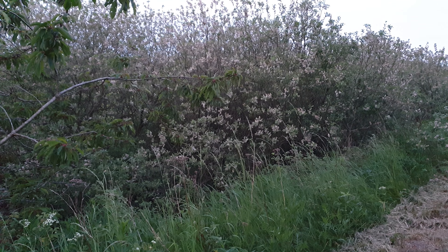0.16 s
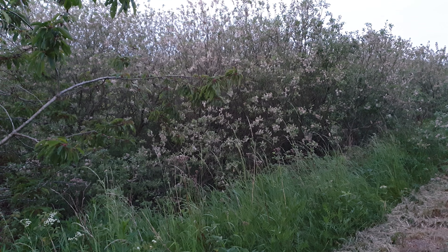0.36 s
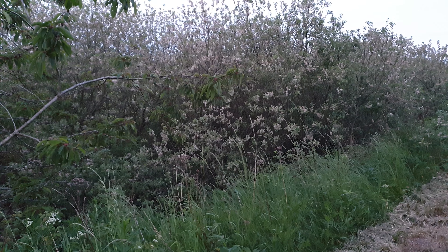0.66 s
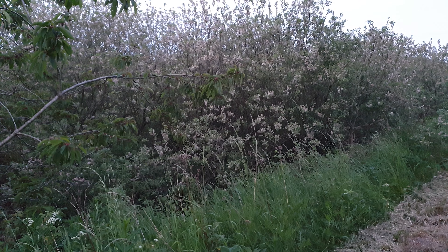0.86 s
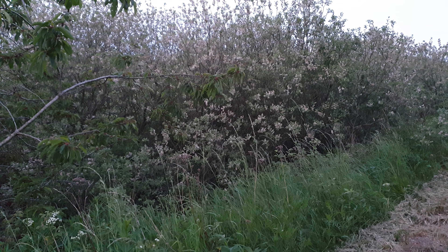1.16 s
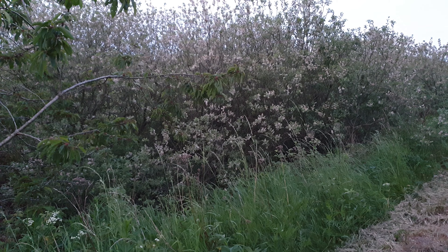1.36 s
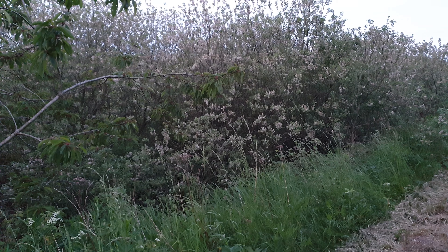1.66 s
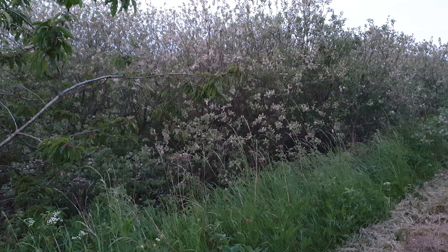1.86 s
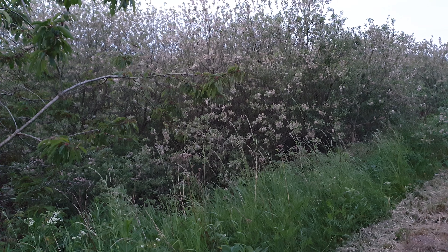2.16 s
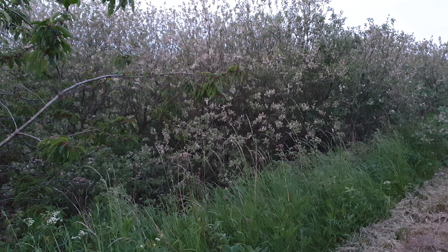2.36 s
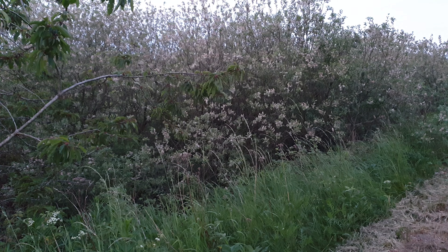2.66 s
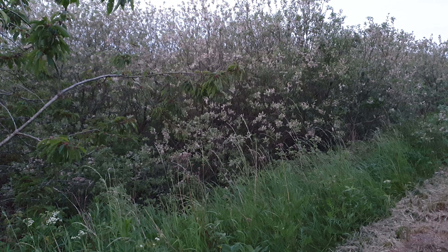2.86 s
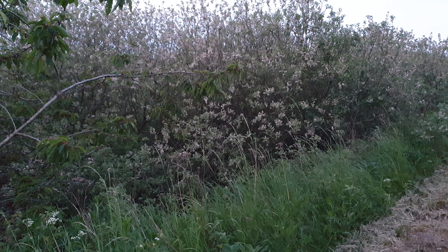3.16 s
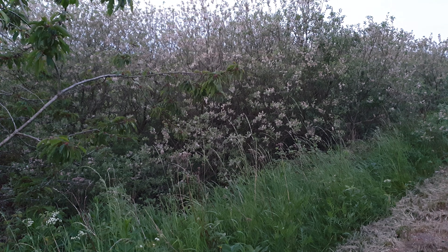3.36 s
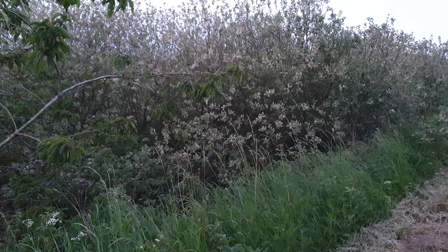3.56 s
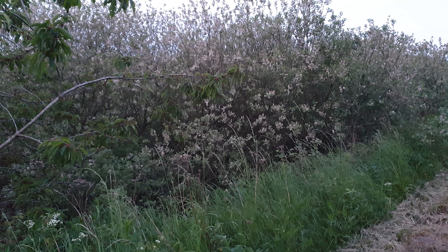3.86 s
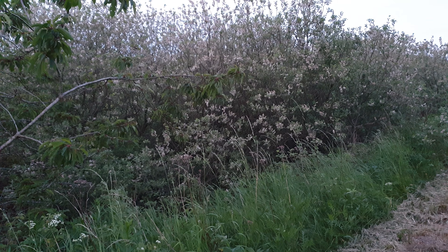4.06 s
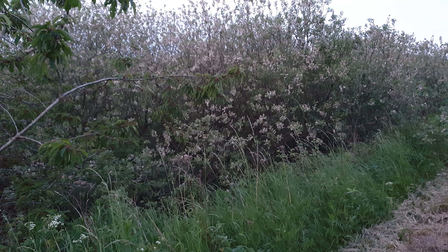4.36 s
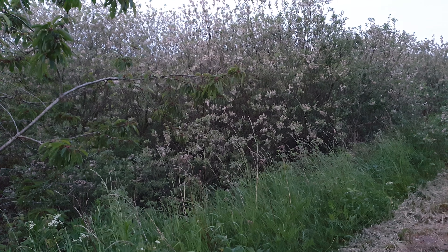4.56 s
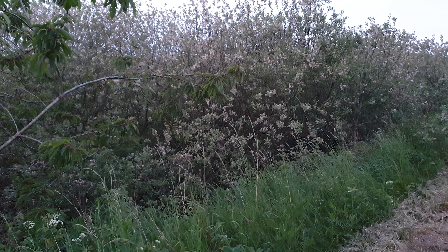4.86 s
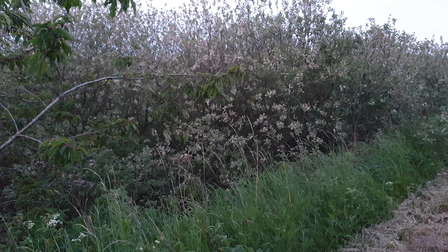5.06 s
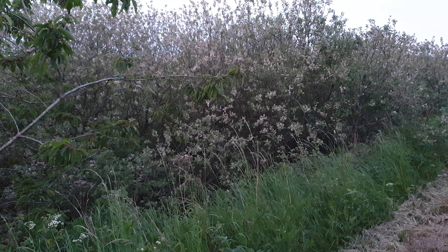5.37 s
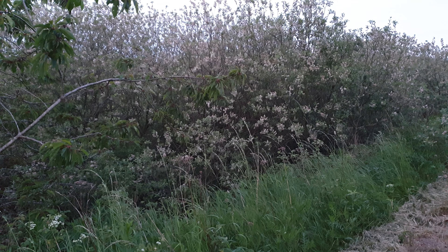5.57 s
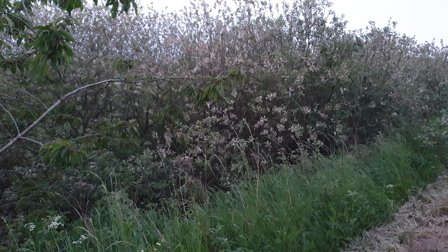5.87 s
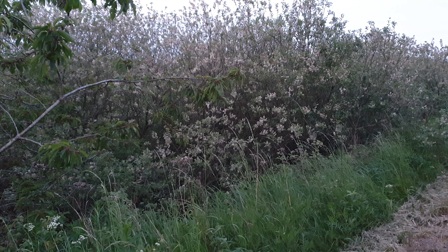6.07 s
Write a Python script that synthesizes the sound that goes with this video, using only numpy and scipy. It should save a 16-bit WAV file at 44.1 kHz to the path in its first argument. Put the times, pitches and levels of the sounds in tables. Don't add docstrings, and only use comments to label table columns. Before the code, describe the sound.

A hidden songbird whistles up, then high and down, trills, snaps, drops paired notes and rattles, while wind gusts rumble on the microphone.

```python
import sys
import numpy as np
from scipy import signal
from scipy.fft import rfft, irfft
from scipy.io import wavfile
from scipy.ndimage import uniform_filter1d

SR = 44100
rng = np.random.default_rng(int(sys.argv[2]) if len(sys.argv) > 2 else 0)


def nominal_scale(level):
    x = np.asarray(level, float) / 20
    return 10 ** x


def wav_out(sig):
    wavfile.write(sys.argv[1], SR, np.round(np.clip(np.atleast_2d(sig).T, -1, 1) * 32767).astype(np.int16))


N = 273861
LEAD = SR // 16

# time in seconds, pitch in Hz, level in dB.
RISING_NOTES = [
    [(-.04, 3138, -47.5), (-.02, 3474, -57.5), (0, 3885, -45.5), (.03, 4170, -50.5), (.05, 4624, -43.5),
     (.065, 4705, -48.5), (.08, 4580, -63), (.098, 4610, -72), (.108, 4550, -55)],
    [(.27, 2655, -70), (.29, 2672, -66.5), (.32, 2687, -53.5), (.365, 2684, -51.5), (.385, 2650, -68),
     (.42, 2633, -54), (.445, 2685, -50), (.468, 2820, -57)],
    [(.458, 2680, -49), (.475, 3050, -62), (.5, 3770, -52), (.53, 4190, -54), (.552, 4400, -49),
     (.56, 4570, -43.5), (.578, 4750, -70), (.6, 4630, -62)],
]
# time in seconds, pitch in Hz, level in dB.
FALLING_NOTES = [
    [(.952, 5960, -68), (.958, 7360, -56), (.972, 7900, -75)],
    [(1.005, 7850, -71), (1.02, 7730, -65), (1.035, 7320, -54.5), (1.05, 6930, -51), (1.065, 6620, -56),
     (1.08, 6484, -48), (1.106, 6410, -44), (1.12, 6315, -49.5), (1.126, 6240, -70)],
    [(1.488, 7130, -64), (1.495, 7600, -60), (1.512, 8800, -80)],
    [(1.525, 8400, -76), (1.54, 8000, -61.5), (1.56, 7060, -50), (1.59, 6900, -65), (1.603, 6436, -38),
     (1.615, 6410, -54), (1.624, 6300, -44.5), (1.63, 6000, -77)],
]
# left minus right in dB, second harmonic in dB, third harmonic in dB,
# and sometimes how much the second harmonic evens out (dB per dB).
RISING_TONE = [(-9.5, -38.5, -49.5), (3.5, -53, -66), (-14, -42, -56)]
FALLING_TONE = [(-2, -51, -60), (3.8, -55, -60), (-2, -56.5, -60), (5, -43, -60, .5)]
# start in seconds,
# length in seconds, first pitch in Hz, last pitch in Hz, level in dB.
FAR_NOTES = [
    (-.05, 0.22, 2705, 2650, -58.5),
    (.515, 0.12, 2196, 2090, -50.5),
    (.8, 0.044, 2380, 2370, -54),
    (.905, 0.08, 2980, 3240, -60),
    (.99, 0.43, 3200, 3340, -78),
    (2.47, 0.19, 2700, 2670, -66),
    (3.42, 0.13, 2300, 2460, -52.5),
    (3.54, 0.019, 2674, 2290, -51.5),
]
FAR_SETTLE = (.75, 1.9, 2.9)
# abrupt end in seconds, peak in dB, pitch factor, length factor.
TRILL_NOTES = [(1.836, -38, 1.0, 0.82), (1.866, -30.5, 1.0, 0.86), (1.899, -31.5, 0.98, 1.05),
               (1.93, -32, 0.98, 0.93), (1.953, -53, 0.98, 0.73), (2.204, -44, 0.94, 0.96),
               (2.233, -34, .99, 0.8), (2.264, -32.5, 1.006, 1.12), (2.292, -41.5, 1, 0.8),
               (2.549, -39.5, 0.97, 0.59), (2.58, -31.5, 1.025, 0.87), (2.61, -30.5, 1.017, 1.15),
               (2.642, -31.5, 1.001, 1.016), (2.673, -36, 0.99, 0.8), (2.697, -49, .999, 1.05),
               (2.927, -41, 0.95, 0.7), (2.957, -32, 0.99, 0.89), (2.988, -31.5, 1.01, 1.08),
               (3.02, -32, 1.007, 0.93)]
# onset in seconds, peak in dB, pitch factor, length factor, second harmonic in dB.
SNAP_NOTES = [
    (3.1445, -42, 0.88, 1.16, -18),
    (3.3236, -42, 0.96, 0.8, -13.5),
    (3.4975, -47, .92, 0.98, -20.5),
    (3.6738, -43.5, 0.95, 1.07, -20),
    (3.8385, -38.5, .99, 0.91, -17),
    (4.0161, -38.5, 1.007, .99, -16.5),
    (4.1868, -36, 1.033, 0.87, -21),
]
# onset in seconds, peak in dB.
DROP_NOTES = [(4.368, -39), (4.4157, -33.5), (4.549, -34), (4.604, -33.5), (4.7281, -33), (4.776, -30.5),
              (4.873, -31.5), (4.922, -29.5), (5.028, -32), (5.0758, -31), (5.176, -32.5), (5.2308, -31.5),
              (5.348, -33.5), (5.3989, -32.5), (5.5054, -33.5), (5.556, -32)]
# onset in seconds, peak in dB, pitch factor.
RATTLE_TICKS = [(5.6591, -48.5, 0.77), (5.6849, -45.5, 0.92), (5.7098, -45, 0.93), (5.7709, -45.5, 0.91),
                (5.7982, -45, 0.88), (5.821, -45, 0.98), (5.8775, -47, 0.89), (5.9031, -42.5, 1),
                (5.9275, -41, 0.87), (5.986, -44, 1), (6.009, -39.5, 0.94), (6.0345, -43.5, 1),
                (6.0873, -42.5, 1), (6.1117, -41.5, 1), (6.138, -41, 0.98), (6.1889, -40, 0.93)]
# seconds after onset, pitch in Hz, level in dB.
TRILL_SHAPE = [
    [(-.027, 1420, -30), (-.022, 1740, -18), (-.017, 1940, -7), (-.012, 2020, -1.5), (-.008, 2030, -.1),
     (-.004, 1995, -1.5), (-.001, 1850, -8), (.001, 1620, -20), (.0035, 1380, -32)],
    [(.004, 1980, -26), (.008, 2010, -13), (.011, 2010, -13), (.015, 1990, -26)],
]
DROP_SHAPE = [
    [(-.001, 2600, -35), (.001, 2483, -4.5), (.003, 2206, 3.5), (.006, 1820, -2), (.009, 1576, -9.5),
     (.013, 1380, -7.5), (.017, 1260, -13.5), (.021, 1224, -23), (.025, 1103, -33.5)],
]
SNAP_SHAPE = [
    [(-.001, 7580, -8), (.0008, 7185, -13.5), (.003, 5680, -8.5), (.006, 3560, -14.5)],
    [(.008, 7105, -9), (.01, 6626, -8), (.013, 5590, -6), (.017, 4120, -8), (.021, 2960, -20),
     (.028, 2200, -19)],
    [(.013, 10020, -30.5), (.0155, 8840, -8), (.02, 7090, -2), (.025, 5800, -14.5), (.03, 4820, -6)],
]
TICK_SHAPE = [
    [(-.0004, 9320, 3.5), (.0001, 6480, -8), (.0007, 5810, -1.5), (.0012, 3330, -2), (.0017, 2200, -15.5)],
    [(.0014, 8600, -21.5), (.0019, 6600, 3.5), (.0026, 5180, -22), (.0032, 2720, -8)],
]
# pitch in Hz, boost in dB.
BEAK_GAPES = [(5400, 1.5), (6300, 5), (5800, 8.5), (5900, 4.5), (6640, 2), (6480, 4.5), (6500, 0.5)]
# frequency in Hz, level in dB.
BEAK_COLOUR = [(2000, -10), (3500, 4.5), (4900, -3), (6300, -1), (7500, -6), (8700, -2.5), (9700, 0.5),
               (11000, -4.5), (12800, -18.5), (15200, -25)]
# delay in seconds, level in dB.
BANK_DELAY, BANK_DB = (0.018, -12.5)
# frequency in Hz, seconds to fall 60 dB.
HEDGE_DECAY = [(1000, 0.65), (2000, 0.3), (4500, 0.31), (7000, 0.34), (12000, 0.21)]
# frequency in Hz, level in dB.
HEDGE_LEVEL = [(1000, -18), (2200, -11), (4500, 1), (6500, -2), (9000, -0.5), (13000, 26)]
# frequency in Hz, dB over the tail.
NEAR_TWIGS = [(1000, 2), (2500, 2), (4000, 5.5), (7000, 14), (13000, 4.5)]
# frequency in Hz, rise in seconds.
ECHO_BUILD = [(2600, .009), (3600, .0006)]
# frequency in Hz, lag in samples.
RIGHT_LAG = [(1500, 0.37), (2700, 5.06), (4500, 4.78), (6400, 5.62), (8500, 3.94), (12000, 9.2)]
# peak in seconds, peak in dB, left minus right in dB, reach in seconds.
LOW_GUSTS = [(0.05, -50.5, -16, 0.13), (0.339, -45.5, -20, 0.18), (.475, -38, -38, 0.17),
             (.8, -54.5, -23, 0.58), (1.07, -47, -3, 0.03), (1.308, -45.5, -30, 0.052),
             (1.4, -40, -32, 0.02), (1.55, -69, -25, 0.16), (1.679, -46, -34, 0.25), (1.849, -69, -7, 0.94),
             (2.149, -49, -14, 0.55), (2.276, -43.5, 0, 0.27), (2.7, -43.5, -19, 0.17),
             (2.919, -48.5, -6.5, 0.98), (3.061, -40, -27.5, 0.049), (3.25, -43, -26, 0.69),
             (3.579, -36, -11, 0.08), (3.931, -40, -11, 0.15), (4.16, -42.5, -17, 0.22),
             (4.256, -38, -37, 0.065), (4.796, -53, 21, 0.057), (5.002, -46, 43, 0.074),
             (5.127, -46, -17, 0.045), (5.356, -74, -1, 0.078), (5.52, -46.5, -17, 0.15),
             (5.658, -28.5, -25, 0.017), (5.839, -49.5, -35, 1), (5.943, -32.5, -24, 0.11),
             (6.049, -26, -47, 0.034), (6.146, -25.5, -30, 0.029)]
# peak in seconds, peak in dB, reach in seconds.
BRIGHT_GUSTS = [(0, -49.5, 0.035), (0.451, -53.5, 0.32), (2.35, -55.5, 0.71), (3.1, -56, 0.95),
                (3.7, -58, 0.11), (3.919, -57, 0.1), (4.259, -58, 0.4), (5.732, -32.5, 0.022),
                (5.901, -60, 0.11), (6.049, -33, 0.012), (6.143, -38.5, 0.048)]
# frequency in Hz, level in dB per Hz.
WIND_COLOUR = [(8.8, -41), (15, -23), (43, 2.5), (64, 3), (128, -16), (166, -19.5), (200, -33),
               (260, -33.5), (440, -120)]
WHOOSH_COLOUR = [(71, -22.5), (120, -3), (162, -11.5), (216, -10.5), (318, -29.5), (450, -47), (580, -47.5),
                 (990, -120)]
AIR_COLOUR = [(71, -44), (120, -0.5), (140, -2), (195, -15), (260, -9.5), (374, -20), (636, -24),
              (958, -20.5), (1870, -26.5), (2340, -15), (2810, -27), (4500, -38.5), (5850, -59.5),
              (9900, -120)]
HISS_COLOUR = [(2650, -27), (4500, -3.5), (5910, -5), (6490, -8.5), (7790, -12), (9170, -10.5), (11800, 1),
               (12800, -1), (15100, .1), (15700, -3.5)]
ROAR_COLOUR = [(410, -40.5), (700, -16), (1010, -3.5), (1160, -7.5), (1360, -7.5), (1600, -38),
               (2080, -62.5), (3520, -120)]
DRONE_COLOUR = [(420, -14.5), (520, 2.5), (580, 9), (660, 2.5), (800, -47.5)]
# frequency in Hz, likeness from 0 to 1.
AIR_LIKENESS = [(200, 0.89), (700, 0.12), (1500, 0.27), (2500, 0.2), (4500, 0.14)]
# time in seconds, level in dB.
HUM_LEVEL = [(0, -60), (.55, -59), (.8, -69), (1.3, -68.5), (2.2, -77), (6.21, -84.5)]
ROAR_LEVEL = [(1.0, -86), (1.5, -76), (1.9, -61), (2.5, -59), (3.55, -59.5), (4.15, -62.5), (4.4, -68),
              (6.2, -101.5)]
DRONE_LEVEL = [(2.4, -92.5), (3.03, -84.5), (3.4, -71.5), (4.77, -75.5), (5.37, -82.5), (6.2, -83)]
# frequency in Hz, level in dB.
HUM_TONES = [(96, -6), (146, -5), (192, -2)]
# time in seconds, pitch factor.
ROAR_PITCH = [(.9, 1.17), (2.4, 1.06), (3.4, 0.99), (4.6, 0.91)]
GAP_FROM, GAP_TO = (.88, 1.72)


def evened(x):
    return x / np.sqrt(np.mean(x ** 2) + 1e-20)


def smooth_chance(shape, *sizes):
    x = rng.standard_normal(shape)
    for size in sizes:
        x = uniform_filter1d(x, size=size)
    return evened(x)


def read(points, hz):
    f, value = np.transpose(points)
    return np.interp(np.log(hz + 1), np.log(f + 1), value)


def follow(rows):
    s, value = np.transpose(rows)
    return np.interp(np.arange(N) / SR, s, value)


def add(mix, s, sound):
    part = mix[:, round(s * SR) + LEAD:][:, :sound.shape[1]]
    part += sound[:, :part.shape[1]]


def noise(spectrum, same, patchy_db, size=1024, slide=((0, 1), (9, 1))):
    frames, hz = 4 * N // size + 5, np.fft.rfftfreq(size, 1 / SR)
    a, b, c, d, patches = rng.standard_normal((frames, len(hz), 5)).T
    patches = uniform_filter1d(patches, size=9, axis=0)
    patches = evened(uniform_filter1d(patches, size=12, axis=1))
    same = np.clip(same + 0 * hz, -1, 1)[:, None]
    left = a + 1j * b
    right = same * left + np.sqrt(1 - same ** 2) * (c + 1j * d)
    factor = np.interp(np.arange(frames) * size / 4 / SR, *np.transpose(slide))
    level_db = read(spectrum, hz[:, None] / factor) + patchy_db * patches
    z = np.array([left, right]) * nominal_scale(level_db)
    return evened(signal.istft(z, nperseg=size, noverlap=3 * size // 4)[1][:, :N])


def sweep(s, hz, db, pan_db, second_db, third_db, even=0, gape=(1, 0)):
    t = np.arange(s[0], s[-1], 1 / SR)
    level_db = np.interp(t, s, db)
    pitch = uniform_filter1d(np.interp(t, s, hz), size=len(t) // 14 + 1, mode="nearest")
    turn = 2 * np.pi * np.cumsum(pitch) / SR + 2 * np.pi * rng.random()
    second = nominal_scale(second_db + even * (max(db) - level_db))
    beak_db = gape[1] * np.exp(-(np.log(pitch / gape[0]) / 0.15) ** 2)
    tone = np.sin(turn) * nominal_scale(beak_db) + second * np.sin(2 * turn)
    tone += nominal_scale(third_db) * np.sin(3 * turn) * (max(hz) < SR / 7)
    tone *= nominal_scale(level_db) * signal.windows.tukey(len(t), min(0.0054 * SR / len(t), .3))
    side = np.interp(t, s, pan_db * np.ones(len(s))) / 2
    return s[0], tone * nominal_scale(np.array([side, -side]))


def syllables(events, shape, gain_db, pan_db, third_db, second_db=0, even=0, gapes=None):
    out = np.zeros((2, N + LEAD))
    for (at, peak_db, factor, stretch, *own_db), gape in zip(events, gapes or [(1, 0)] * len(events)):
        for rows in shape:
            s, hz, db = np.transpose(rows)
            level_db = db + peak_db + gain_db
            octave_db = second_db + sum(own_db)
            add(out, *sweep(at + s * stretch, hz * factor, level_db, pan_db, octave_db, third_db, even, gape))
    return out


def far_birds():
    attack, release = 0.2, 0.84
    fade_db, waver_db = 22.5, 1.5
    sag, wobble = 0.028, 0.006
    until, bend, ease = FAR_SETTLE
    out, u = np.zeros((2, N + LEAD)), np.linspace(0, 1, num=60)
    ends = np.maximum(1 - u / attack, 0) ** 2 + np.maximum(1 - (1 - u) / release, 0) ** 2
    for at, length, from_hz, to_hz, level_db in FAR_NOTES:
        waver = uniform_filter1d(rng.standard_normal(len(u)), size=5) * np.sqrt(5)
        hz = to_hz + (from_hz - to_hz) * np.maximum(1 - (u / until) ** bend, 0) ** ease
        hz = hz * (1 - sag * u ** 4 + wobble * waver[::-1])
        db = level_db - fade_db * ends + waver_db * waver
        add(out, *sweep(at + u * length, hz, db, pan_db=.5, second_db=-74, third_db=-55))
    return out


def whistles(notes, tones):
    out = np.zeros((2, N + LEAD))
    for rows, tone in zip(notes, tones):
        add(out, *sweep(*np.transpose(rows), *tone))
    flutter = signal.oaconvolve(rng.standard_normal(N + LEAD), signal.windows.blackman(700), "same")
    out *= nominal_scale(1.6 * evened(flutter))
    return signal.sosfilt(signal.butter(10, 13400, "low", fs=SR, output="sos"), out)


def late(x):
    hz = np.fft.rfftfreq(len(x), 1 / SR)
    return irfft(rfft(x) * np.exp(-2j * np.pi * hz * read(RIGHT_LAG, hz) / SR), len(x))


def hedge(x):
    hz = np.fft.rfftfreq(256, 1 / SR)
    out, length = np.zeros((2, N + LEAD)), SR * 3 // 4
    for k in range(3):
        taps = np.zeros((2, length))
        at = np.arange(60, length - 16, 16) + rng.integers(0, 16, (2, (length - 61) // 16))
        np.put_along_axis(taps, at, rng.choice([-1., 1.], at.shape), 1)
        t, z = signal.stft(taps, SR, nperseg=256)[1:]
        fade = nominal_scale(-60 * t / read(HEDGE_DECAY, hz)[:, None])
        twigs_db = read(NEAR_TWIGS, hz)[:, None] - 60 * t / 0.037
        fade = np.sqrt(fade ** 2 + nominal_scale(twigs_db))
        fade *= (1 - np.exp(-(t + .001) / read(ECHO_BUILD, hz)[:, None])) ** 2
        fade *= nominal_scale(read(HEDGE_LEVEL, hz))[:, None] / np.sqrt((fade ** 2).sum(1, keepdims=True) * 4)
        tail = signal.istft(z * fade, SR, nperseg=256)[1]
        opening = np.clip((np.arange(tail.shape[1]) - 30) / 90, 0, 1)
        tail = tail * np.sin(np.pi / 2 * opening) ** 2
        tail[1] = .5 * late(tail[0]) + 1.24 * tail[1]
        turn = np.sqrt(2 / 3) * np.cos(2 * np.pi * (11 * np.arange(N + LEAD) / SR + k / 3))
        out += signal.fftconvolve(x.mean(0)[None] * turn, tail, axes=1)[:, :N + LEAD]
    return out


def puffs(at, peak_db, reach):
    return nominal_scale(2 * (peak_db - 20 * abs(np.arange(N) / SR - at) / reach))


def wind():
    calm_db, whoosh_calm_db = -70.5, -85
    power = nominal_scale(2 * calm_db) * np.full((2, N), .5)
    for at, peak_db, pan_db, reach in LOW_GUSTS:
        left_share = 1 / (1 + nominal_scale(-2 * pan_db))
        power = power + puffs(at, peak_db, reach) * np.array([[left_share], [1 - left_share]])
    ports = 2 * np.sqrt(power / power.sum(0))
    lumps = smooth_chance((2, N), 1500, 1500)
    low = np.sqrt(power.sum(0)) * noise(WIND_COLOUR, same=0.054, patchy_db=2.5, size=2048)
    bright = np.sqrt(nominal_scale(2 * whoosh_calm_db) + sum(puffs(*row) for row in BRIGHT_GUSTS))
    whoosh = nominal_scale(-3) * bright * noise(WHOOSH_COLOUR, same=.45, patchy_db=1.5)
    buffeting = ports * nominal_scale(1.6 * lumps - 1.2) * (low + whoosh)
    travel = .13
    return travel * np.tanh(buffeting / travel)


def open_air():
    likeness = read(AIR_LIKENESS, np.fft.rfftfreq(1024, 1 / SR))
    return nominal_scale(-65) * noise(AIR_COLOUR, same=likeness, patchy_db=2.5)


def engine_hum():
    speed = 1 + 0.01 * smooth_chance(N, 6000)
    turn = 2 * np.pi * np.cumsum(speed) / SR
    return nominal_scale(follow(HUM_LEVEL)) * sum(nominal_scale(db) * np.sin(hz * turn) for hz, db in HUM_TONES)


def microphone_hiss():
    return nominal_scale(-79.5) * noise(HISS_COLOUR, same=.1, patchy_db=.3)


def road_roar():
    roar = noise(ROAR_COLOUR, same=.85, patchy_db=1.3, slide=ROAR_PITCH)
    return nominal_scale(follow(ROAR_LEVEL) + 1.5) * roar


def trill():
    first = syllables(TRILL_NOTES[:5], TRILL_SHAPE, gain_db=-1.5, pan_db=-3.0,
                      third_db=-48.5, second_db=-34.5, even=1.17)
    rest = syllables(TRILL_NOTES[5:], TRILL_SHAPE, gain_db=-0.5, pan_db=-3.0,
                     third_db=-60.5, second_db=-45.0, even=0.94)
    return first + rest


def exhaust_drone():
    return nominal_scale(follow(DRONE_LEVEL)) * noise(DRONE_COLOUR, same=0.84, patchy_db=0.5)


def distance():
    far = open_air() + road_roar() + engine_hum() + exhaust_drone()
    far[0] = np.roll(far[0], 16)
    return far


def snaps():
    low_voice, high_voice = SNAP_SHAPE[:2], SNAP_SHAPE[2:]
    out = syllables(SNAP_NOTES, low_voice, gain_db=1.0, pan_db=-5.0, third_db=-28, even=0.24, gapes=BEAK_GAPES)
    out += syllables(SNAP_NOTES[:4], high_voice, gain_db=-5.0, pan_db=-4.5,
                     third_db=-60, second_db=-11, gapes=BEAK_GAPES[:4])
    out += syllables(SNAP_NOTES[4:], high_voice, gain_db=-1.5, pan_db=-4.0,
                     third_db=-60, second_db=-16.0, gapes=BEAK_GAPES[4:])
    return out


def drops():
    events = [(s, db, 0.97, 1.001) for s, db in DROP_NOTES]
    return syllables(events, DROP_SHAPE, gain_db=-1.0, pan_db=-3.0, third_db=-54.0, second_db=-45.0)


def rattle():
    chance = 1 + 0.05 * rng.standard_normal((len(RATTLE_TICKS), 2))
    ticks = [(s, db, factor, 0.93 * a * b) for (s, db, factor), (a, b) in zip(RATTLE_TICKS, chance)]
    return syllables(ticks, TICK_SHAPE, gain_db=4.0, pan_db=-3.0, third_db=-28, second_db=-19.5)


def rough_voice(x):
    x = x * (1 + .22 * smooth_chance(N + LEAD, 12))
    x = x * nominal_scale(2.5 * smooth_chance(N + LEAD, 70) - .5)
    hz = np.fft.rfftfreq(N + LEAD, 1 / SR)
    return irfft(rfft(x) * nominal_scale(read(BEAK_COLOUR, hz)), N + LEAD)


def bird():
    harsh = rough_voice(snaps() + rattle())
    trills, dropped = trill(), drops()
    song = harsh + whistles(RISING_NOTES, RISING_TONE) + whistles(FALLING_NOTES, FALLING_TONE)
    song += trills + dropped
    low = np.roll(nominal_scale(-6.5) * trills + nominal_scale(-4) * dropped, round(.002 * SR), axis=1)
    unscattered = trills + dropped - low + (1 - nominal_scale(-1)) * harsh
    song += nominal_scale(BANK_DB) * np.roll(song, round(BANK_DELAY * SR), axis=1)
    soften = signal.butter(6, 14600., "low", fs=SR, output="sos")
    song, scattered = signal.sosfilt(soften, np.array([song, song - unscattered]))
    song[1] = late(song[1])
    far = far_birds()
    return (song + 0.11 * far + nominal_scale(0.5) * hedge(scattered + 0.5 * far))[:, LEAD:]


def treble_gaps(x):
    hz, t, z = signal.stft(x, SR, nperseg=1024)
    power = uniform_filter1d((abs(z) ** 2).mean(0), size=3, axis=1)
    high = power * (hz > 3300)[:, None]
    ratio = hz[:, None] / hz[high.argmax(0)]
    faint = uniform_filter1d(power, size=11, axis=0) < high.max(0) * nominal_scale(2 * -43)
    keep = ~faint | (ratio < GAP_FROM) | (ratio > GAP_TO)
    below_edge = (hz < 15800)[:, None]
    return signal.istft(z * keep * below_edge, SR, nperseg=1024)[1][:, :N]


def scene():
    return bird() + wind() + distance() + microphone_hiss()


def top_cut(x):
    return signal.sosfilt(signal.butter(12, 15860, fs=SR, output="sos"), x)


def record(dry):
    cut = signal.sosfilt(signal.butter(4, 38., "high", fs=SR, output="sos"), dry)
    return top_cut(treble_gaps(cut))


dry = scene()
out = record(dry)
wav_out(out)
```